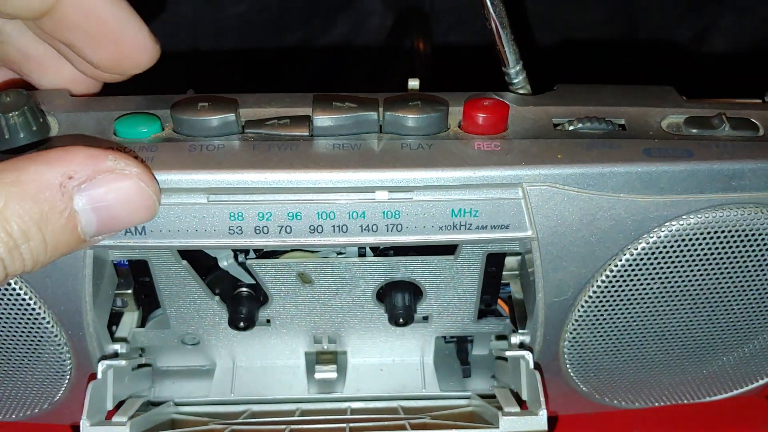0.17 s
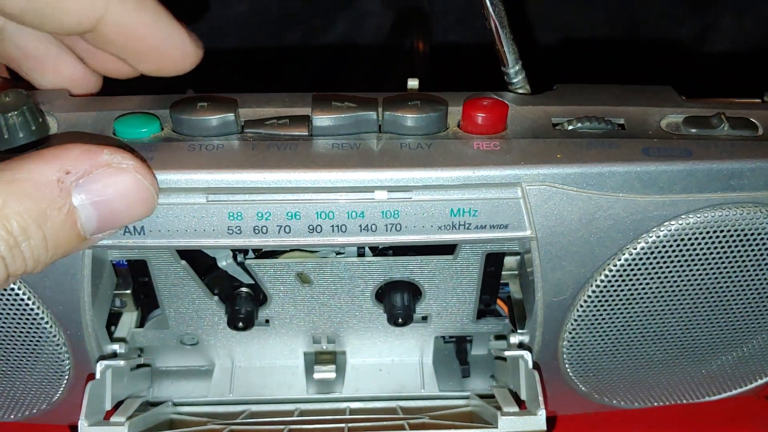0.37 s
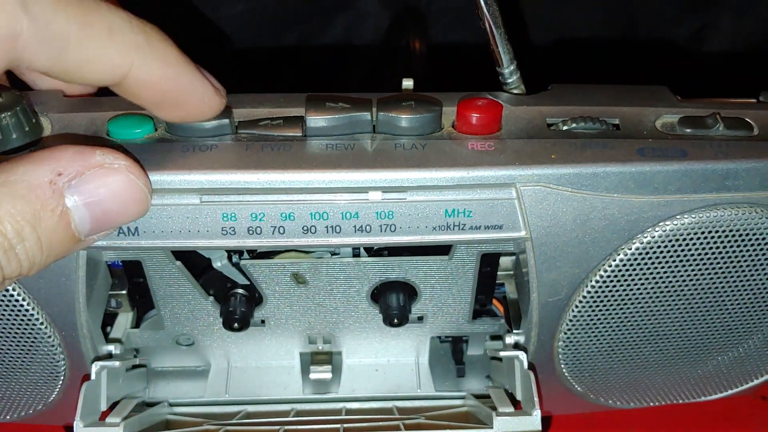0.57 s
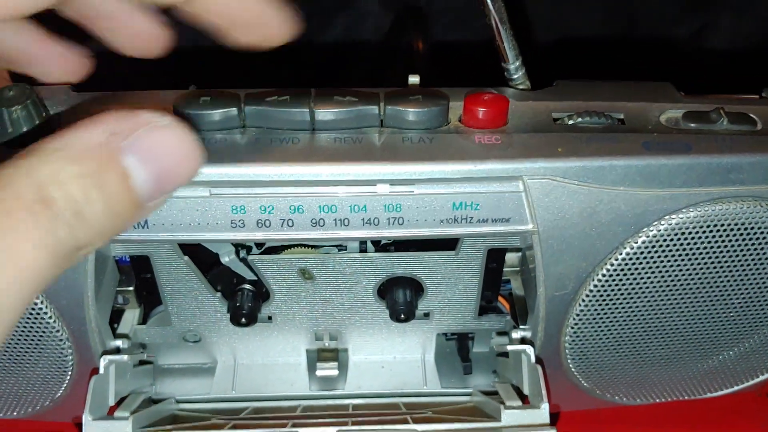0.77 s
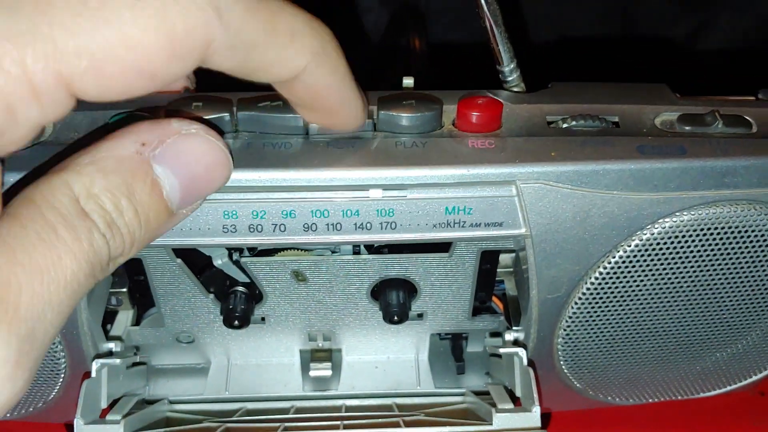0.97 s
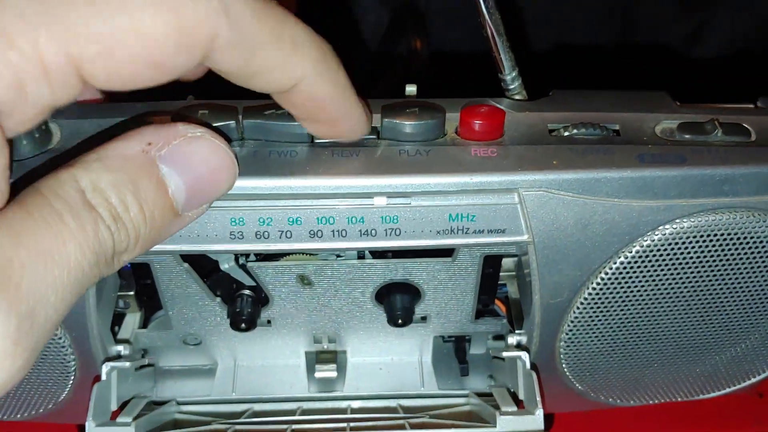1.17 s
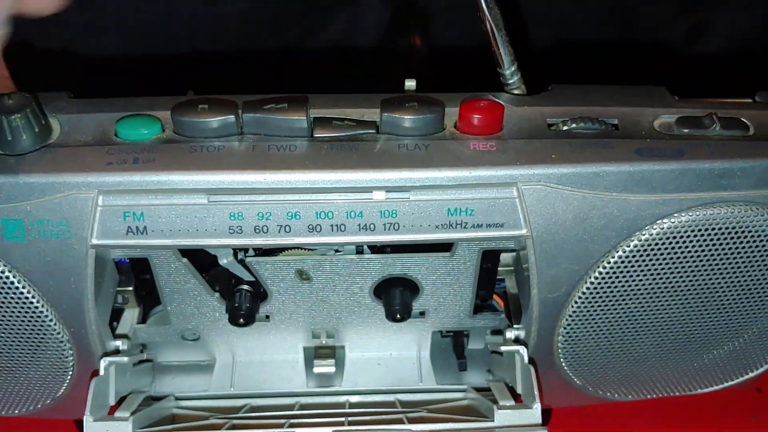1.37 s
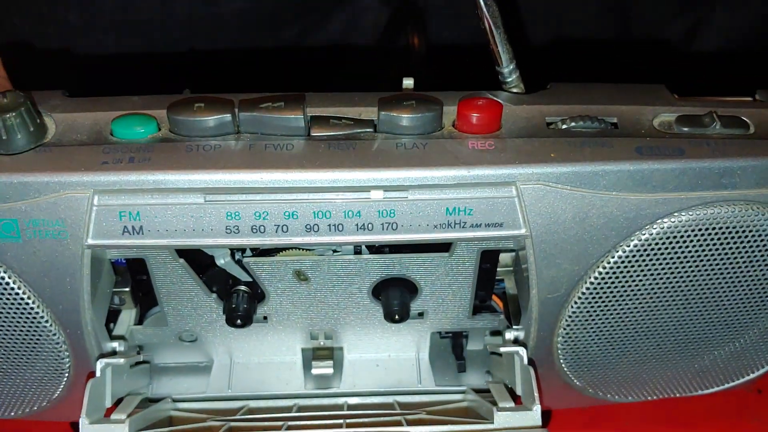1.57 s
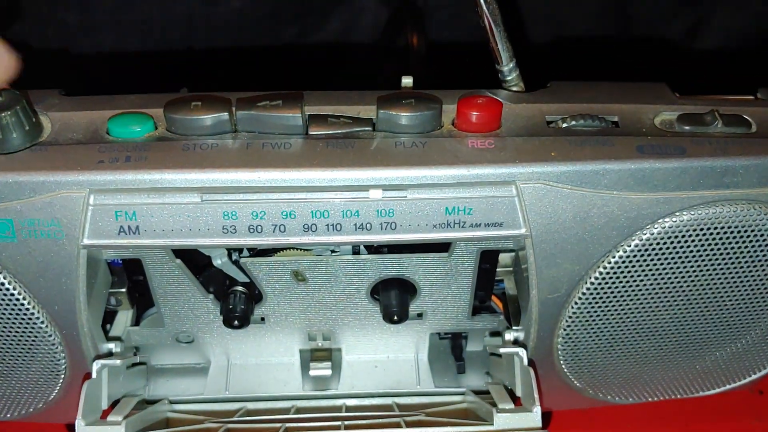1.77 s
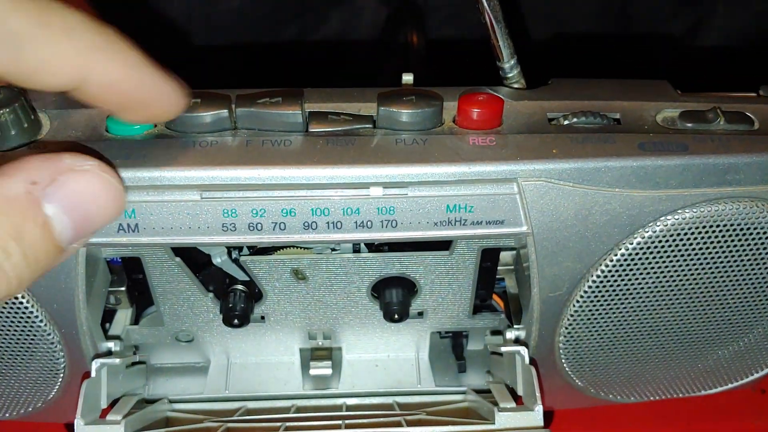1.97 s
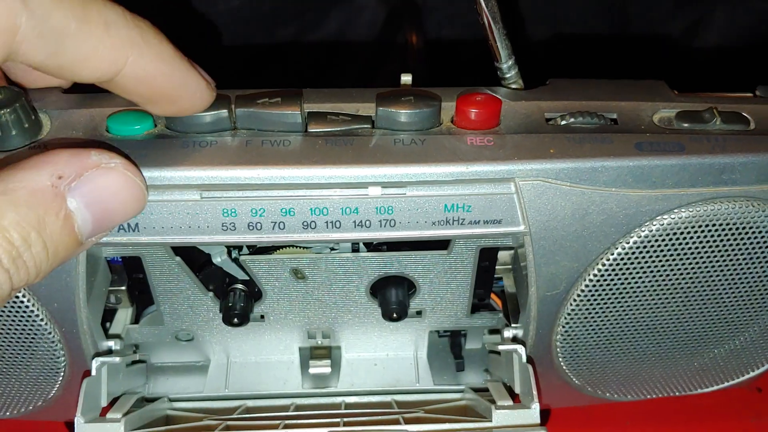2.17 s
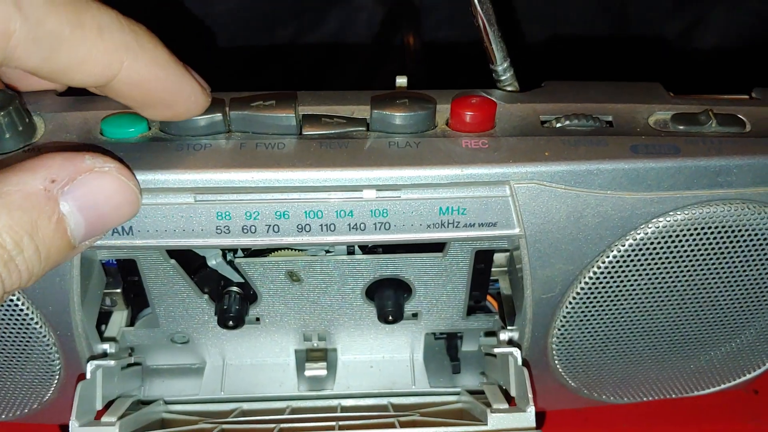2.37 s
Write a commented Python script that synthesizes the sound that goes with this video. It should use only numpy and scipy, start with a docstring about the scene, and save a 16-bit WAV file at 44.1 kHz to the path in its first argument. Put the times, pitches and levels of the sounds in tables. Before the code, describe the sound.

Sharp mechanical clacks come from two cassette player keys, close up in a quiet small room. Each slides and latches as the case rocks and thumps. Two faint fingertip taps follow, over a slight mains buzz.

```python
"""In a quiet small room, two keys of a small cassette player are pressed close to the microphone.
Each key slides, ticks and snaps the latch; the plastic case rings, and the player thumps as it
rocks on its feet. Later a finger taps a key lightly, twice. A faint mains buzz runs underneath."""
import sys
import numpy as np
from scipy import signal
from scipy.fft import rfft, irfft
from scipy.io import wavfile
from scipy.ndimage import uniform_filter1d

SR = 44100
rng = np.random.default_rng(int(sys.argv[2]) if len(sys.argv) > 2 else 0)


def put_to_file(sound):
    """Save the sound as 16-bit audio at rate SR, in the file named by the first command-line argument."""
    columns = np.atleast_2d(sound).T  # one column per channel
    safe = np.clip(columns, -1, 1)
    whole_steps = np.round(safe * 32767)
    wavfile.write(sys.argv[1], SR, whole_steps.astype(np.int16))


N = 106854

FILTER_SIZE = 4096
HZ = np.fft.rfftfreq(FILTER_SIZE, 1 / SR)


def amp(db):
    """Turns decibels (dB) into a number to multiply by."""
    return 10 ** (np.asarray(db) / 20)


def unit(x):
    """Scales a sound to an average (rms) level of one."""
    return x / np.sqrt(np.mean(x ** 2) + 1e-20)


def read(points, hz=HZ):
    """Looks up values between the rows of a frequency table."""
    f, value = np.transpose(points)
    return np.interp(np.log(hz + 1), np.log(f + 1), value)


def add(mix, start, sound):
    """Adds a stereo sound at a start time in seconds."""
    part = mix[:, max(round(start * SR), 0):][:, :sound.shape[1]]
    part += sound[:, :part.shape[1]]


def fade(t, fade_s):
    """Dies away by 60 dB in the fade time, fade_s."""
    return np.exp(-np.log(1000) * t / max(fade_s, 1e-3))


def colour(x, db):
    """Turns each frequency in HZ up or down, with no ringing ahead of the sound."""
    log_gain = np.log(amp(np.maximum(np.r_[db, db[-2:0:-1]], -100)))
    taps = np.fft.ifft(np.exp(np.conj(signal.hilbert(log_gain)))).real
    return signal.fftconvolve(x, taps[None, :FILTER_SIZE // 2], axes=1)[:, :x.shape[1]]


def stereo_noise(size, likeness):
    """Noise whose left and right sides are as alike as the table asks."""
    left, other = rfft(rng.standard_normal((2, size)))
    alike = np.clip(read(likeness, np.fft.rfftfreq(size, 1 / SR)), -1, 1)
    return irfft([left, alike * left + np.sqrt(1 - alike ** 2) * other], size)


# Each row: frequency in Hz, how alike left and right are (1 means the same).
LIKENESS = [(60, .4), (170, 1), (350, .6), (700, .85), (1300, 0.034), (3000, 0), (12000, 0.15)]

def crack(fade_s, rise_s=0, size=16384):
    """Plastic rings briefly at many pitches at once, making a burst of noise."""
    t = np.arange(size) / SR
    burst = stereo_noise(size, LIKENESS) * fade(t, fade_s)
    for _ in range(3):  # even out the frequencies
        spectrum = rfft(burst)
        power = abs(uniform_filter1d(abs(spectrum) ** 2, size=300, axis=1))
        burst = irfft(spectrum / np.sqrt(power + 1e-12)) * (t < fade_s)
    burst *= np.minimum(t / max(rise_s, 1 / SR), 1)
    return burst / np.linalg.norm(burst, axis=1, keepdims=True)


# Each row: frequency in Hz, relative level in dB.
AIR_TONE = [(12, -30.5), (20, 0.5), (32, -0.5), (55, -5.5), (120, -1), (175, -6.5), (206, -7), (242, -7.5),
            (330, -16), (439, -22), (755, -14.5), (1200, -24), (1450, -18), (3450, -25.5), (5800, -37),
            (6500, -49.5), (11000, -35.5), (13000, -62)]
# Each row: frequency in Hz, how alike left and right are.
AIR_LIKENESS = [(30, 0.62), (120, .8), (700, 1), (2000, 0.28), (9000, .1)]

def room_air(level_db=-62.5):
    """The soft, low noise of the room."""
    spectrum = rfft(stereo_noise(N, AIR_LIKENESS))
    gain = amp(read(AIR_TONE, np.fft.rfftfreq(N, 1 / SR)))
    return amp(level_db) * unit(irfft(spectrum * gain, N))


# Each row: pitch in Hz, level in dB.
HUM_TONES = [(30, -70.5), (119.5, -73), (238, -69.5), (660, -77), (780, -76.5)]

def hum(t):
    """A few steady tones blend into a hum."""
    return sum(np.sqrt(2) * amp(db) * np.sin(2 * np.pi * (hz * t + rng.random()))
               for hz, db in HUM_TONES)


# Each row: frequency in Hz, relative level in dB.
BUZZ_TONE = [(800, -22.5), (1500, -9), (2600, -3.5), (3650, -5.5), (3950, 6), (4300, -13.5), (5000, -1.5),
             (5450, -10.5), (5850, -4), (6200, -28.5), (7000, -22), (8300, -14), (11000, -15), (12500, -38)]

def mains_buzz(t, ticks_per_s=119.92, level_db=-69.5, fizz_s=.003, fizz_db=-2):
    """A thin buzz that ticks and fizzes twice in each cycle of the mains power."""
    period = 1 / ticks_per_s
    offset = t % period - period / 2
    ticks = signal.fftconvolve(np.sinc(offset * SR)[None], crack(.009), axes=1)[:, :N]
    fizz = rng.standard_normal((2, N)) * np.exp(-(offset % period) / fizz_s)
    return amp(level_db) * unit(colour(unit(ticks) + amp(fizz_db) * unit(fizz), read(BUZZ_TONE)))


# Each row: time in seconds, change in the level of buzz and hiss in dB.
BUZZ_DIP = [(0, -0.5), (0.66, -0.5), (0.82, -12), (1.18, -7.5), (1.32, -1), (1.7, -1), (2.42, -2.5)]

def background(hiss_hz=1500, right_lag_samples=11):
    """Room noise, hum and buzz; the buzz and the hissy part of the noise sink for a while."""
    t = np.arange(N) / SR
    air = room_air()
    hiss = signal.sosfiltfilt(signal.butter(2, hiss_hz, "high", fs=SR, output="sos"), air)
    dip = amp(np.interp(t, *np.transpose(BUZZ_DIP)))
    left, right = air - hiss + hum(t) + dip * (mains_buzz(t) + hiss)
    return np.array([left, np.roll(right, right_lag_samples)])


# Each row: frequency in Hz, pan in dB (how much louder left is than right).
BALANCE = [(200, -1), (600, -3.5), (1000, -3.5), (1700, -11), (2600, 0), (4150, -5.5), (5500, 5), (9000, 0)]

def place(x, pan_db):
    """Spreads a sound of the player over the two microphones."""
    side = (read(BALANCE) + pan_db) / 2
    even = 10 * np.log10(np.cosh(side * np.log(10) / 10))  # keeps the total power the same
    return np.vstack([colour(x[:1], side - even), colour(x[1:], -side - even)])


# The tone shared by scrapes and clicks. Each row: frequency in Hz, boost or cut in dB.
PLASTIC_TONE = [(40, -21.5), (120, -13.5), (300, -12.5), (500, -8), (700, -2), (5000, 2.5), (5750, -0.5),
                (6300, -9.5), (7300, 0), (11200, -7.5), (12000, -18), (12800, -34)]
# Five frequency bands in Hz, low to high.
SCRAPE_BANDS_HZ = [300, 700, 2500, 4500, 9000]
# Each row: start in seconds, length in seconds, then a level in dB for each band.
SCRAPES = [(0.613, .024, -97, -49, -54, -56, -72.5), (0.648, .017, -37, -34.5, -29, -31.5, -38.5),
           (0.774, 0.026, -40, -37, -35, -34, -55), (1.0065, 0.005, -48, -41.5, -39, -47, -55),
           (1.0547, 0.019, -33, -40, -39, -28, -23.5), (1.241, 0.0062, -55.5, -50, -50, -50.5, -61),
           (1.105, 0.044, -8, -22.5, -28.5, -44, -59), (1.138, 0.035, -33.5, -24.5, -43.5, -69, -97),
           (1.252, 0.043, -38.5, -41, -50.5, -55.5, -76), (1.850, 0.066, -65.5, -63.5, -62.5, -52.5, -87),
           (1.899, 0.04, -54.5, -60, -55, -46.5, -78.5)]

def scrape(length, *bands_db, slips_per_s=1100, low_cut_hz=170):
    """Plastic parts slide and rattle in a swell of tiny slips."""
    t = np.arange(SR // 4) / SR
    slips = (rng.random(len(t)) < slips_per_s / SR) * rng.choice([-1, 1], len(t))
    grains = unit(signal.fftconvolve(slips[None], crack(0.012), axes=1)[:, :len(t)])
    grains = signal.sosfilt(signal.butter(2, low_cut_hz, "high", fs=SR, output="sos"), grains)
    swell = np.sqrt(abs(np.sin(np.pi * np.minimum(t / length, 1))))
    tone_db = read(list(zip(SCRAPE_BANDS_HZ, bands_db))) + read(PLASTIC_TONE)
    return place(colour(grains * swell, tone_db), pan_db=0)


# Each row: frequency in Hz, level in dB, fade time in seconds.
ECHO_BANDS = [(150, -10.5, .2), (400, -2.5, .2), (801.5, -12.5, .15), (2000, -11, .16), (3300, -14.5, 0.15),
              (5030, -20, .13), (10500, -18, .13), (12200, -30, .06)]

def echo(sound, rise_s=0.012):
    """Sound bounces around the cassette slot and the room, leaving a short, blurred tail."""
    hz, t, bands = signal.stft(stereo_noise(SR // 2, LIKENESS), SR, nperseg=256)
    db, fade_s = (read(np.array(ECHO_BANDS)[:, [0, k]], hz)[:, None] for k in (1, 2))
    bands = bands * amp(db - 60 * t / fade_s) * np.sqrt(2 * np.log(1000) / (fade_s * SR))
    tail = signal.istft(bands, SR, nperseg=256)[1]
    tail *= np.minimum(np.arange(tail.shape[1]) / SR / rise_s, 1)
    return signal.fftconvolve(sound, tail, axes=1)


# The ringing of case and mechanism. Each row: pitch in Hz, level in dB, fade time in seconds.
CASE_TONES = [(402, -26, .14), (635, -24, .1), (708, -19, .09), (832, -19, .08), (1017, -24, .09),
              (1160, -21, .08), (1288, -22, .07), (1459, -20, .065), (1705, -20, .06), (2013, -25, .06),
              (2506, -26, .04), (3210, -26, .07), (3836, -22, .03), (4100, -21, .035), (4950, -26, .03)]
# Five frequency bands in Hz, low to high.
CLICK_BANDS_HZ = [750, 1500, 2900, 4500, 9000]
# Each row: start in seconds, a level in dB for each band, fade time in seconds, pan in dB,
# pitch of the struck part in Hz.
CLICKS = [ (0.6371, -6.5, -7, -7, 1, -8.5, 0.026, 6, 4600),
          (0.663, -4.5, 8.5, 8.5, 8.5, -4, 0.042, 1.5, 3150),
          (0.6669, 12.5, 13, 13, 18.5, 14.5, 0.0066, 9, 4260),
          (0.6689, 10.5, 12, 17.5, 5, 9.5, 0.011, -9, 4230),
          (0.7616, -12.5, -19, -16, -18.5, -36, 0.057, 4, 4500),
          (0.7902, 8.5, 7.5, 6, 8, -11.5, 0.029, 5.5, 4990),
          (0.795, 8.5, 10.5, 1, -20, -5.5, 0.037, 3, 770),
          (0.8010, 8, -5.5, -1, -4.5, -21, 0.055, -2, 1704), (1.0112, -7.5, -3, 6, 2, -23, .016, 5.5, 4100),
          (1.0140, 0.5, -6, -1, -12.5, -34, .022, -1.5, 900),
          (1.0342, -2, -4.5, -2.5, -14, -19.5, 0.049, -2, 3830),
          (1.0588, 16.5, 13, 7.5, 3, -6, 0.03, 4.5, 779), (1.0651, 11.5, 17, 16, 12.5, 5, 0.015, 5, 3900),
          (1.082, 7.5, 1, -3.5, -22, -30.5, .014, -8, 1650),
          (1.2439, -4.5, -1.5, -13, -12.5, -45, 0.028, 3, 1750),
          (2.1295, -17.5, -28, -28.5, -25.5, -45, 0.037, 3.5, 3313)]

def click(low_db, mid_db, high_db, sharp_db, top_db, fade_s, pan_db, part_hz):
    """A key or latch hits: a short crack, coloured by the struck part, and the case rings on."""
    hit = crack(fade_s, rise_s=0.00029)
    t = np.arange(hit.shape[1]) / SR
    phases = rng.uniform(0, 2 * np.pi, (len(CASE_TONES), 2))
    for (hz, db, ring_s), (both, apart) in zip(CASE_TONES, phases):
        apart = (apart - np.pi) * (1 - read(LIKENESS, hz))
        ring = np.sin(2 * np.pi * hz * t + np.array([[both], [both + apart]])) * fade(t, ring_s)
        hit += amp(db) * ring / np.linalg.norm(ring[0])
    bands = list(zip(CLICK_BANDS_HZ, [low_db, mid_db, high_db, sharp_db, top_db]))
    part_db = 5.5 / (1 + ((HZ / part_hz - 1) / 0.045) ** 2)  # a narrow boost at the part's pitch
    return place(colour(hit, read(bands) + read(PLASTIC_TONE) + part_db), pan_db)


# The ringing of air and tabletop. Each row: pitch in Hz, level in dB, fade time in seconds.
HOLLOW_TONES = [(238.8, -16.5, 0.29), (158.6, -15.5, 0.4)]
# Each row: frequency in Hz, boost or cut of the knock in dB.
KNOCK_TONE = [(50, -20), (110, -12), (220, 3), (400, -4.5), (680, 7), (1200, -13.5), (3000, -23.5),
              (8000, -44.5)]
# Each row: start in seconds, boom level in dB, pitch in Hz, fade time in seconds, knock level in dB.
THUMPS = [(0.641, -30, 164.4, 0.073, -16), (0.673, -23.5, 159.4, 0.13, 3), (0.804, -27, 184.2, 0.17, -22),
          (0.917, -29.5, 166.8, 0.13, -10.5), (0.956, -36.5, 183.8, 0.096, -29),
          (1.034, -32, 170, 0.13, -25), (1.066, -17, 178.4, 0.15, -10), (1.119, -19.5, 147, 0.063, -16),
          (1.215, -37.5, 171, 0.3, -15), (1.245, -39, 236, 0.21, -31.5), (1.303, -25.5, 157.6, 0.16, -5.5),
          (1.447, -32, 157.8, 0.082, -25.5), (1.504, -46, 161.2, 0.26, -34)]

def thump(boom_db, hz, fade_s, knock_db, rise_s=0.013):
    """A foot of the player lands with a dull knock and the hollow body booms."""
    t = np.arange(SR // 2) / SR
    boom = np.sin(2 * np.pi * hz * t) * fade(t, fade_s)
    boom += sum(amp(db) * np.sin(2 * np.pi * f * t) * fade(t, ring_s) for f, db, ring_s in HOLLOW_TONES)
    sound = np.tile(amp(boom_db) * boom * np.minimum(t / rise_s, 1), (2, 1))
    knock = colour(crack(0.059, rise_s=0.0013), read(KNOCK_TONE) + knock_db)
    add(sound, 0, knock)
    return sound


def latch_shove(level_db=-32.5, hz=70, fade_s=0.02):
    """The first latch shoves the whole case, making a deep, short bump."""
    t = np.arange(SR // 5) / SR
    return np.tile(amp(level_db) * np.sin(2 * np.pi * hz * t) * fade(t, fade_s), (2, 1))


# Each row: start in seconds, low tone's level in dB, high tone's level in dB, pan in dB.
FINGER_TAPS = [(1.9280, -55.5, -44.5, -18), (2.1532, -42, -46, -12.5)]

def finger_tap(low_db, high_db, pan_db, low_hz=765, high_hz=1525, peak_s=0.00082):
    """A soft fingertip makes a key ring very briefly at two pitches."""
    t = np.arange(SR // 20) / SR
    swell = (t / peak_s) * np.exp(1 - t / peak_s)
    low = amp(low_db) * np.sin(2 * np.pi * low_hz * t)
    high = amp(high_db) * np.cos(2 * np.pi * high_hz * t)
    return amp([[pan_db / 2], [-pan_db / 2]]) * swell * (low + high)


def scene():
    """Lays the player's sounds over the background; clicks, scrapes and taps get an echo."""
    mix = background()
    sources = [(click, CLICKS), (scrape, SCRAPES), (finger_tap, FINGER_TAPS)]
    sounds = [(start, play(*row)) for play, table in sources for start, *row in table]
    for start, sound in sounds:
        add(mix, start, sound)
        add(mix, start, echo(sound))
    for start, *row in THUMPS:
        add(mix, start, thump(*row))
    add(mix, start=.668, sound=latch_shove())
    return mix


def record(dry, ceiling=.85, top_hz=12900):
    """Rounds off the tallest peaks and removes the highest treble."""
    rounded = dry / (1 + (dry / ceiling) ** 4) ** .25
    treble_cut = signal.firwin(201, top_hz, window=("kaiser", 9), fs=SR)
    return signal.oaconvolve(rounded, treble_cut[None], "same")


dry = scene()
out = record(dry)
put_to_file(out)
```